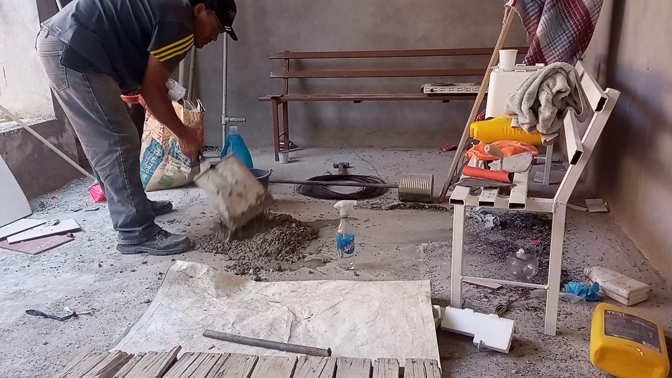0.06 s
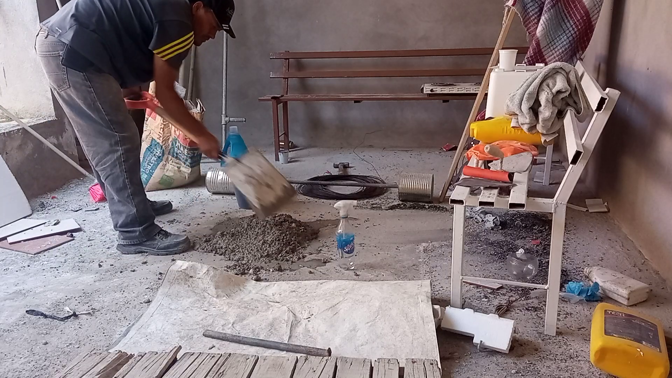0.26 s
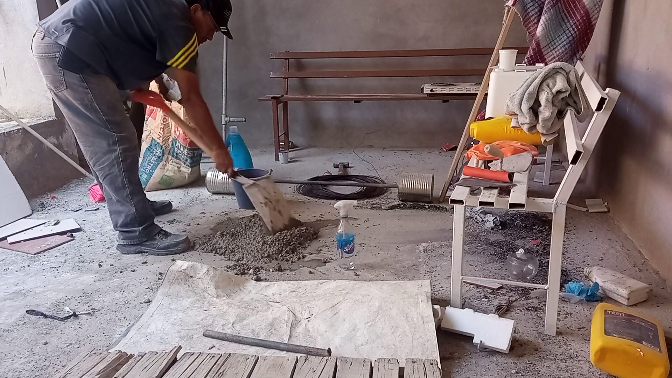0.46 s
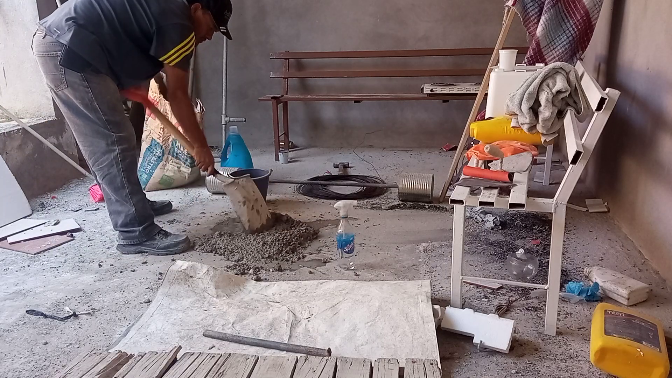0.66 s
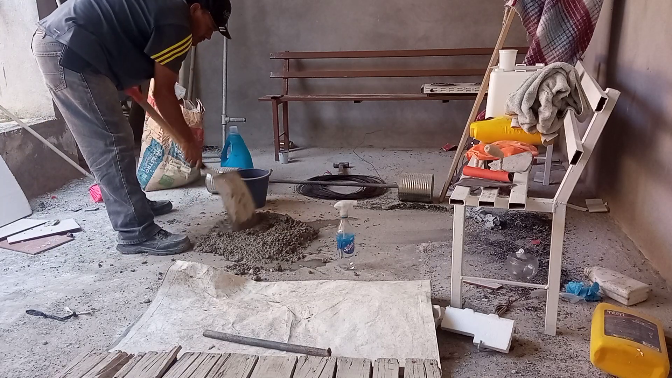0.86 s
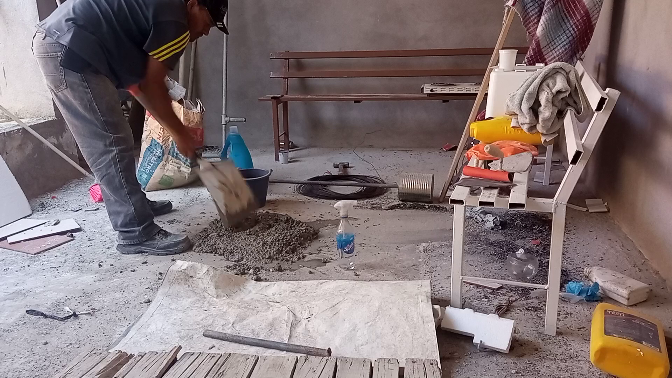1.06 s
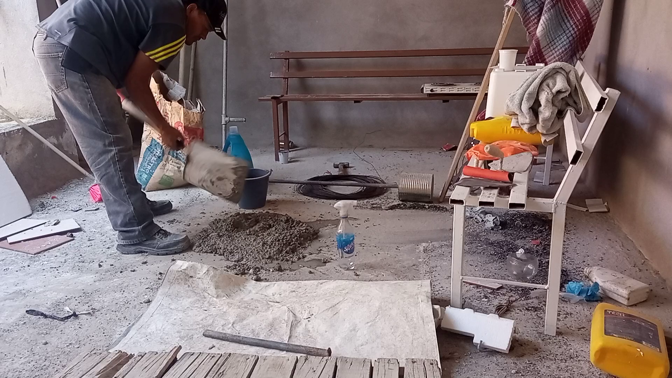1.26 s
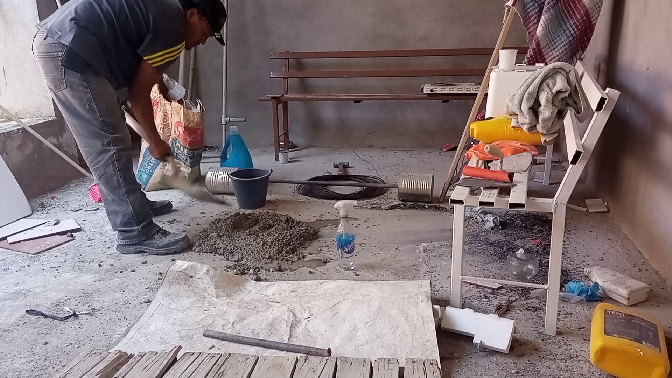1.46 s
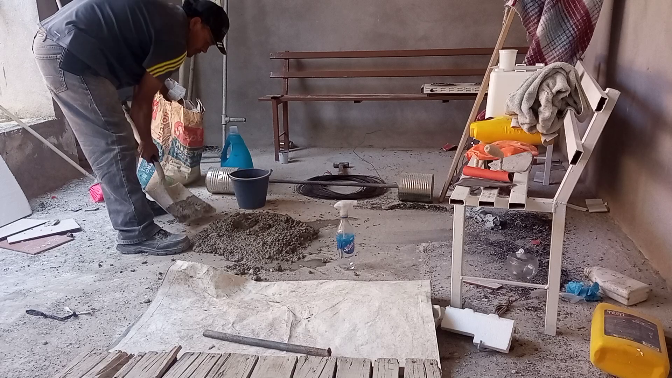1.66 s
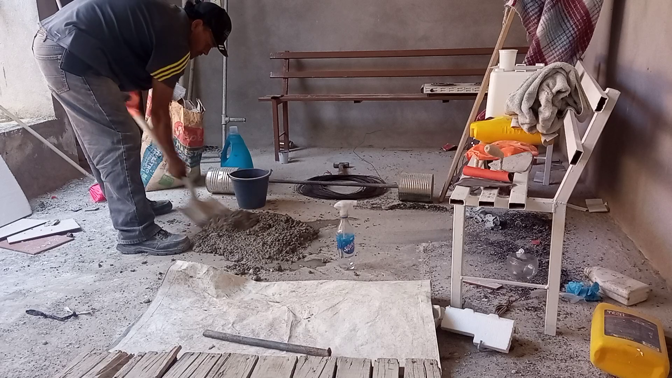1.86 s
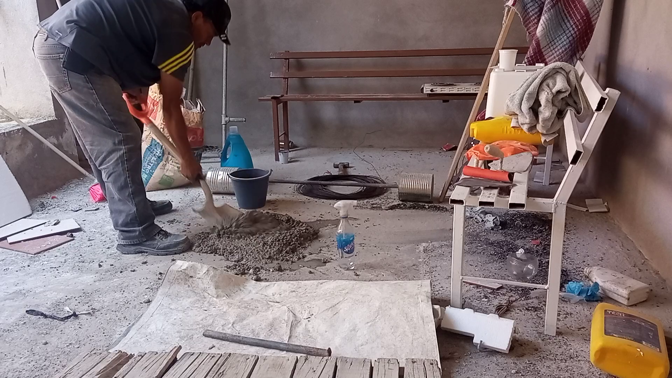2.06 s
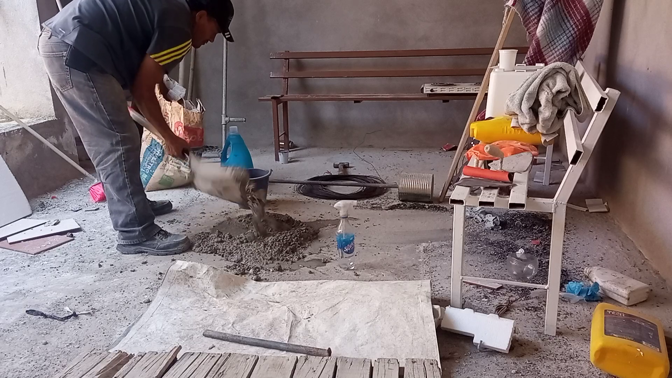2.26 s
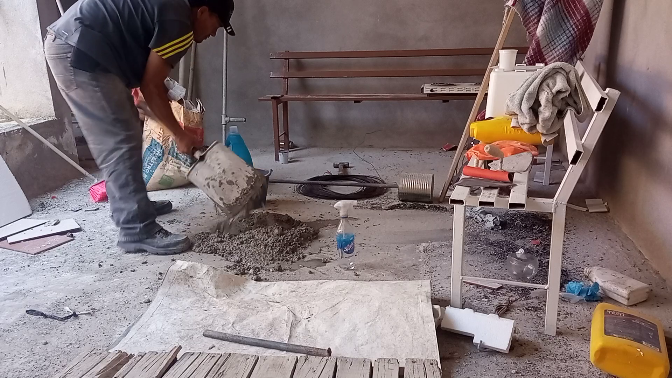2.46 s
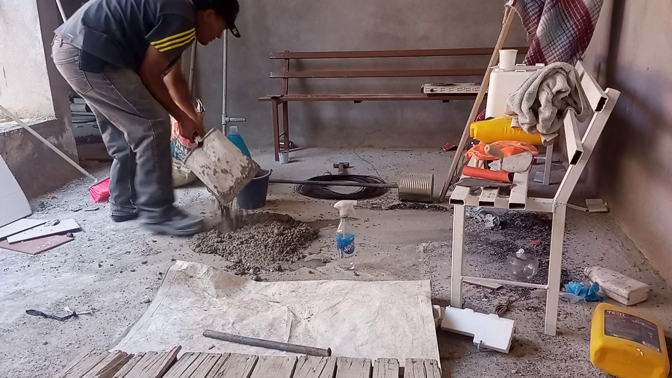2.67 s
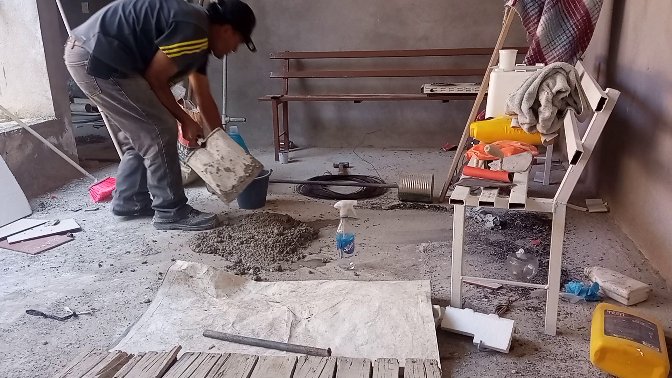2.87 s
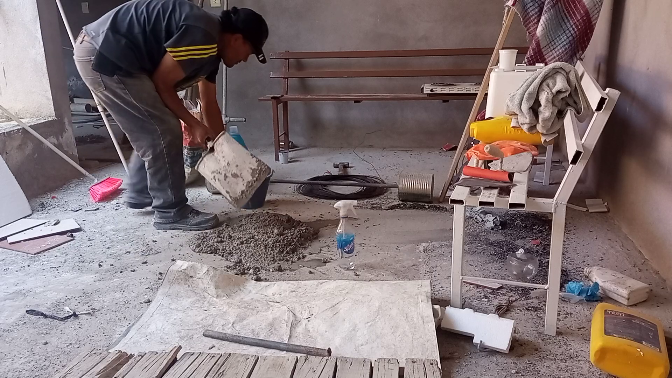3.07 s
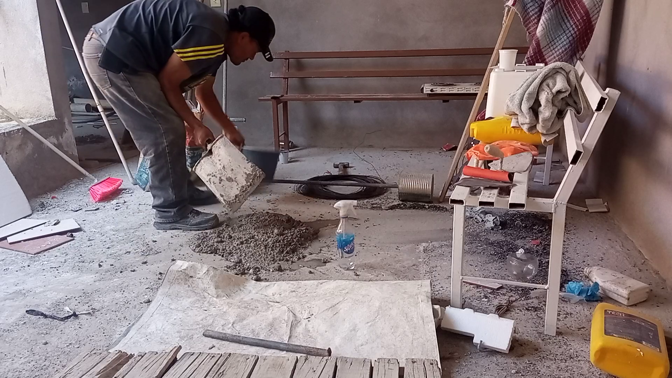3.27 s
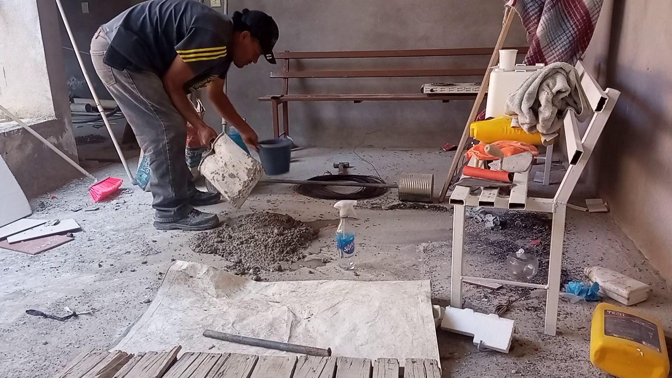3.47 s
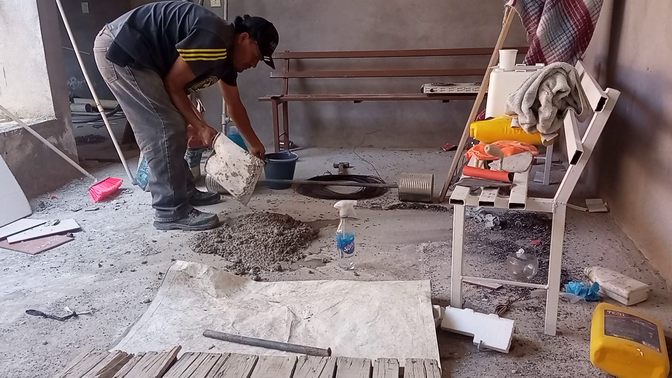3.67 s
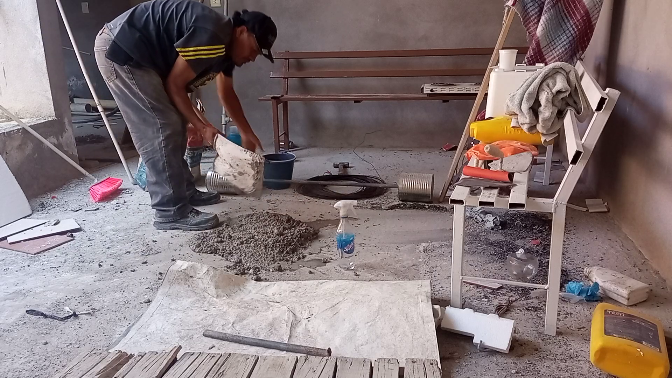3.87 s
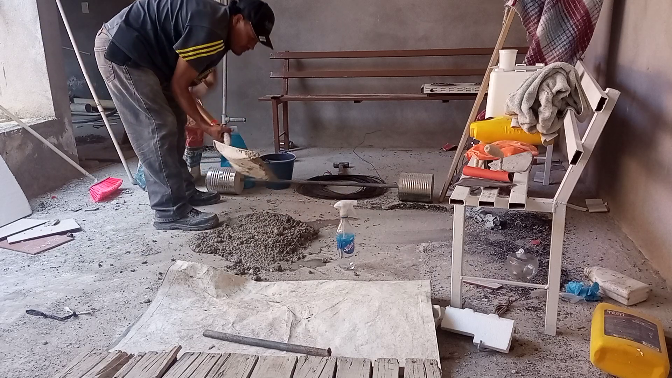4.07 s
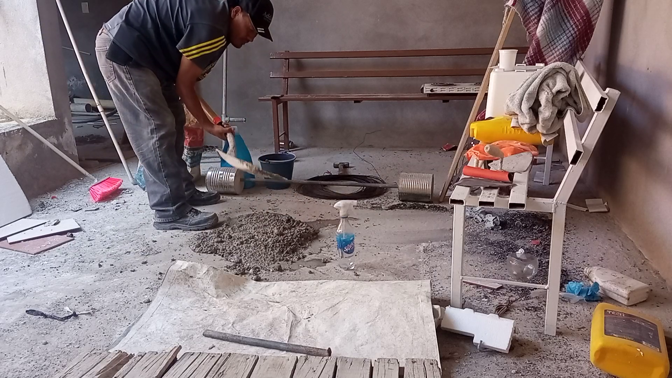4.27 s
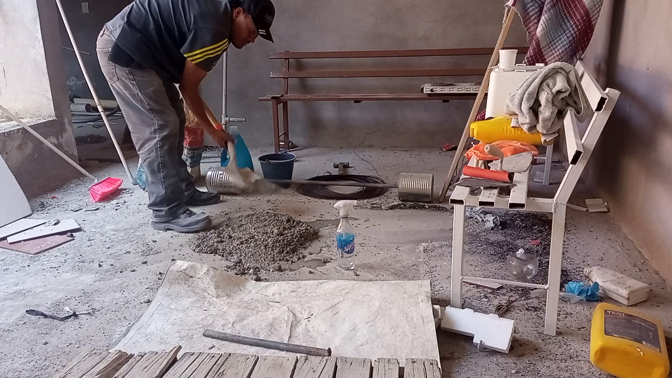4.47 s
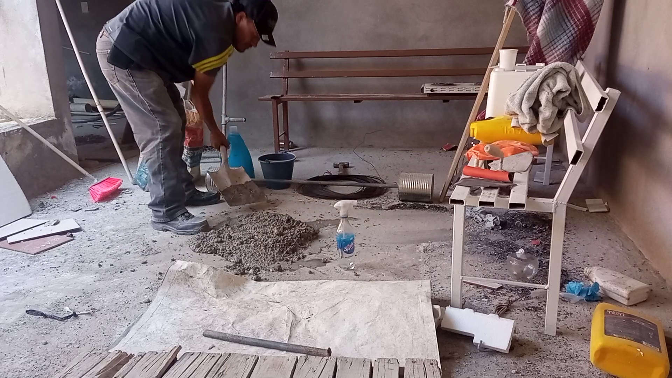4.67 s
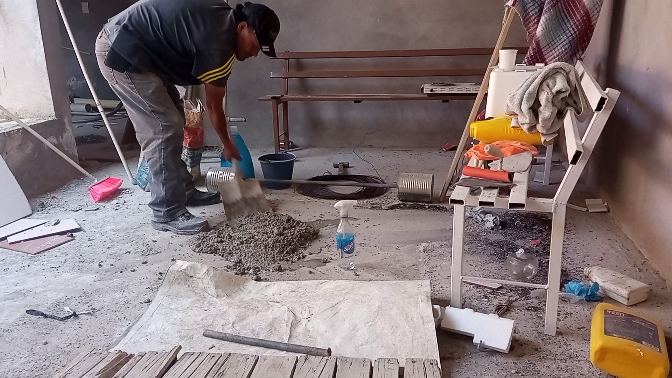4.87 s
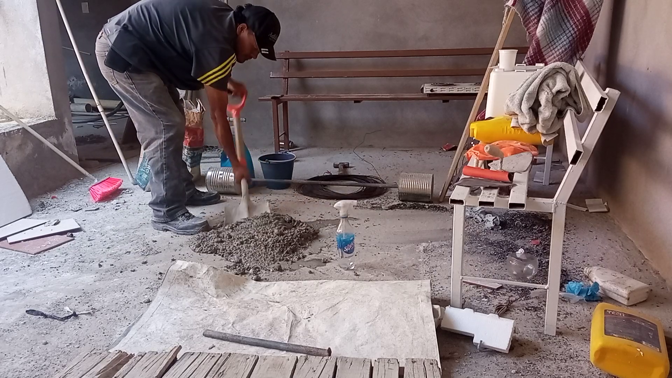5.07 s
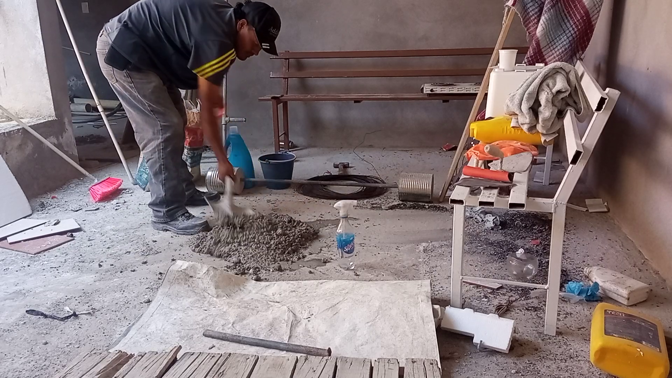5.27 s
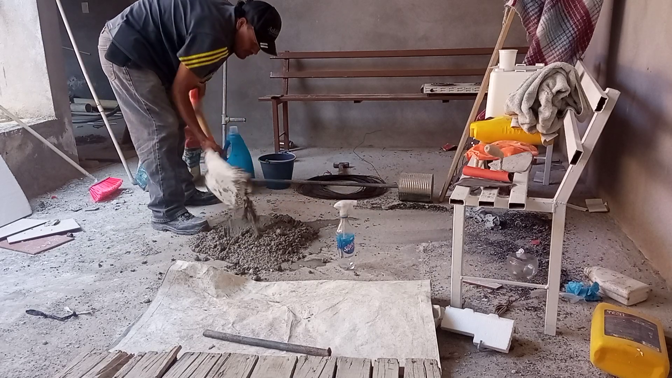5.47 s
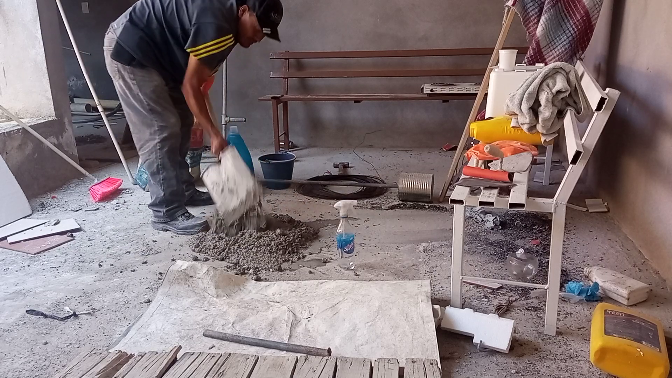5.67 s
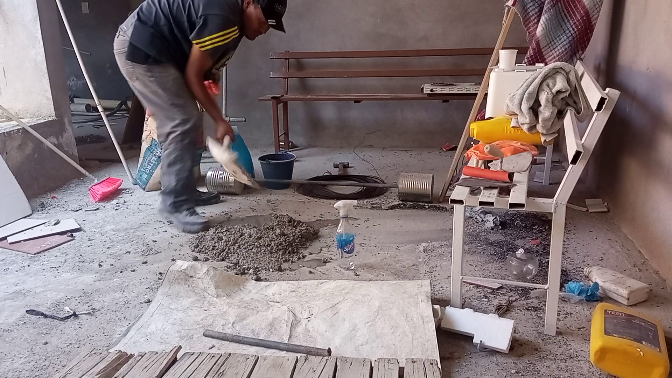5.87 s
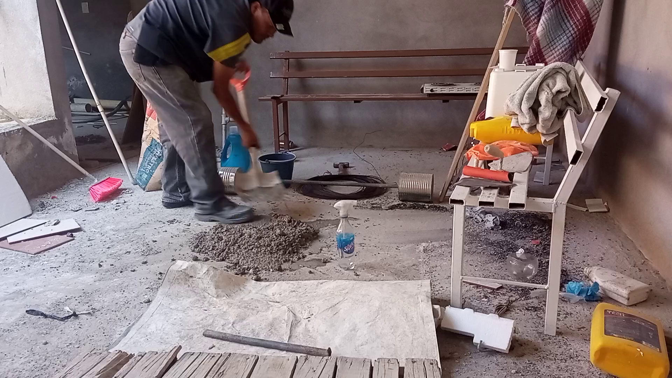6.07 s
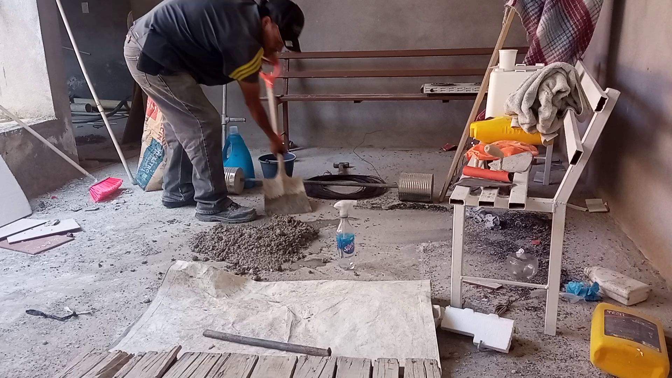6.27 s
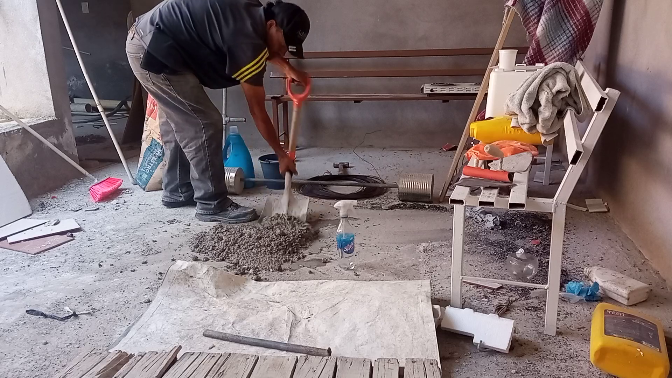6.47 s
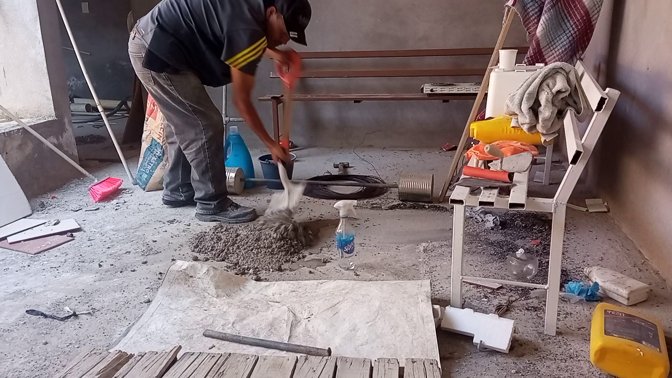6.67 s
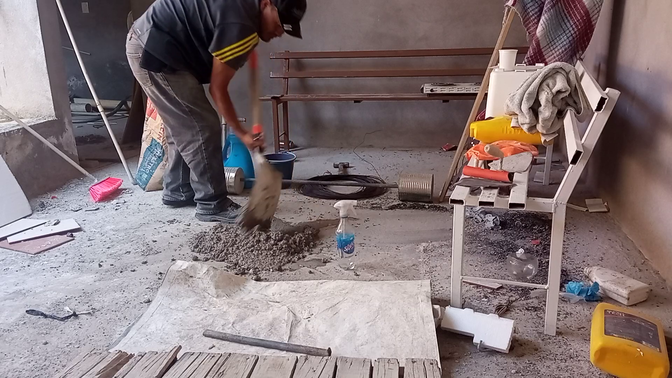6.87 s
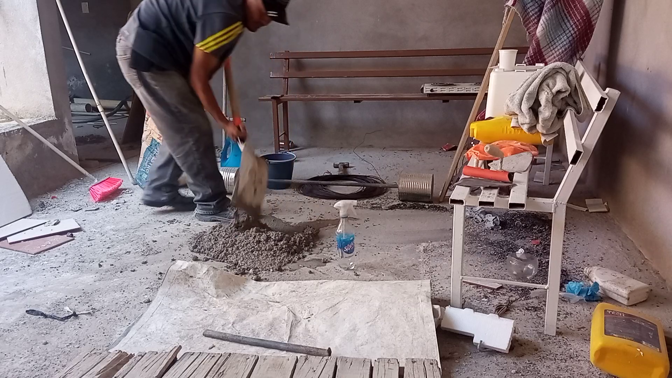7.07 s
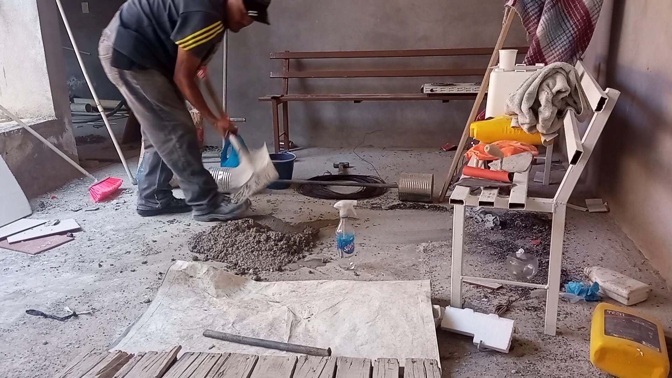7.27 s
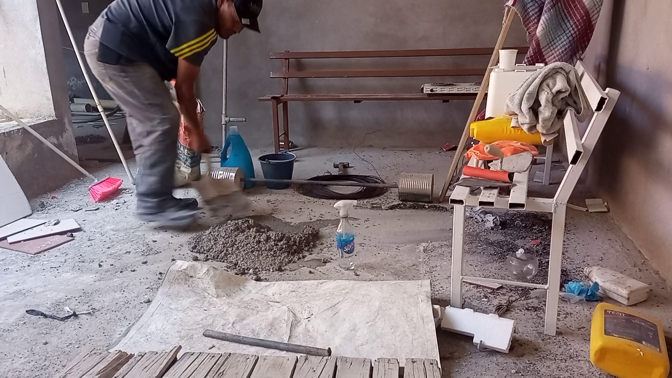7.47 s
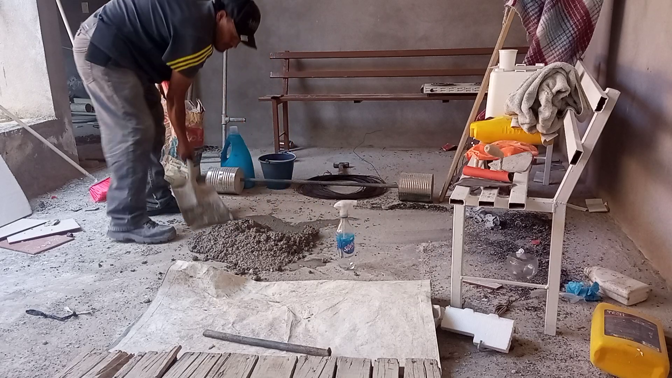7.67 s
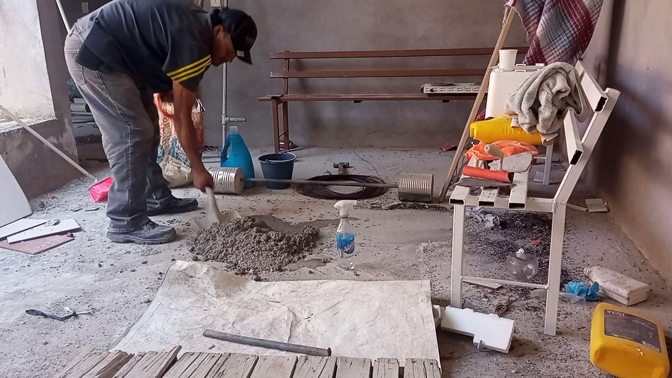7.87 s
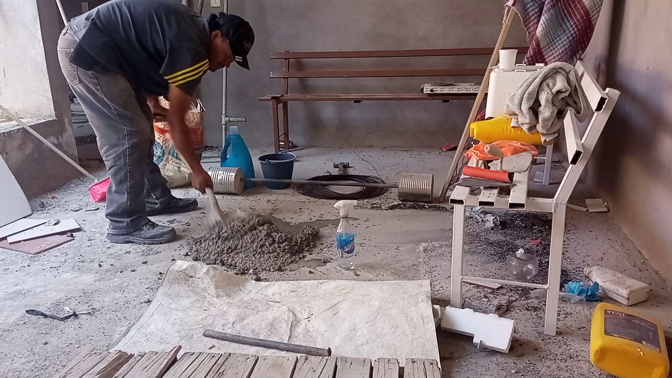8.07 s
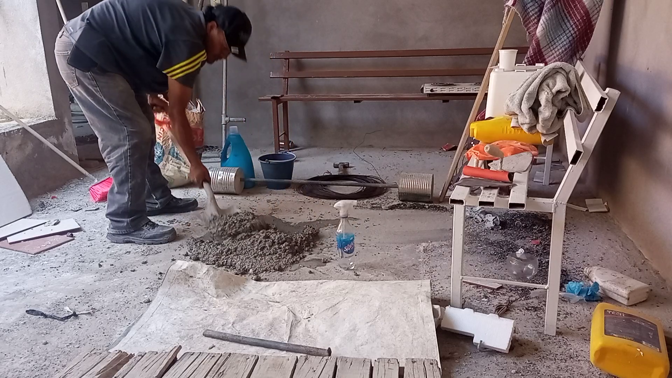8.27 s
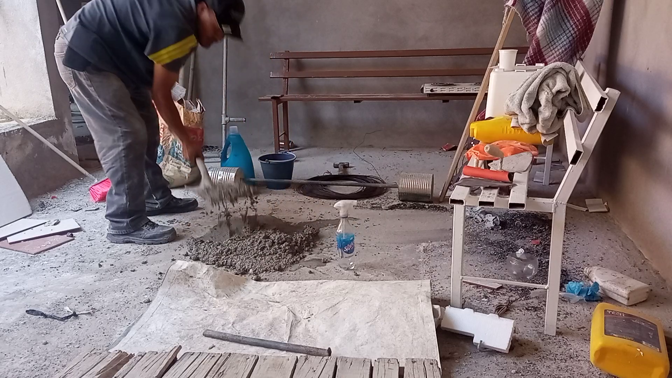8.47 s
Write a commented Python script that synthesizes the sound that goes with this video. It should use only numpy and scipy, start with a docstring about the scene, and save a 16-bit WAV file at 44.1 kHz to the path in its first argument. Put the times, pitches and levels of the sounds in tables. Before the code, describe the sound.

A steel shovel scrapes over gritty concrete and turns wet sand and cement, with one hollow bucket knock in a bare, echoing room.

```python
"""A steel shovel turns wet sand and cement on a concrete floor, in a bare, ringing room.
First the mix slides off the blade and falls in clods; near 1.8 s the blade lands, grinds over
grit and fills. As that load slides off, the worker shifts his feet, and at 3.7 s he sets a
plastic bucket down with a hollow knock. Two light clacks near 4.4 s lead into three more strokes
(4.9, 6.3 and 7.7 s), each trailed by the hiss of sliding mix; a few more clods land around 7 s."""
import sys
import numpy as np
from scipy import signal
from scipy.fft import rfft, irfft
from scipy.io import wavfile

SR = 44100
rng = np.random.default_rng(int(sys.argv[2]) if len(sys.argv) > 2 else 0)


def to_wav(sig):
    """Store sig (one row per channel, or 1-D mono) as 16-bit WAV at the path in sys.argv[1].

    Samples outside -1..1 are clipped; the rate is SR.
    """
    pcm = np.clip(np.atleast_2d(sig), -1, 1) * 32767
    pcm = np.round(pcm).astype(np.int16)
    wavfile.write(sys.argv[1], SR, pcm.T)  # frames by channels


N = 375728
TIME = np.arange(N) / SR
HALF_SECOND = TIME[:SR // 2]


def amp(db):
    """Decibels to gain."""
    return 10 ** (np.asarray(db) / 20)


def unit(x):
    """Scales to rms 1."""
    return x / np.sqrt(np.mean(x ** 2) + 1e-20)


def unit_hit(x):
    """Scales a one-shot to the energy of 20 ms at rms 1."""
    return x * np.sqrt(SR / 50 / (np.sum(x ** 2) + 1e-20))


def curve_at(points, hz):
    """Joins (frequency, value) points by lines on a log-frequency axis."""
    point_hz, value = np.transpose(points)
    return np.interp(np.log(hz + 1), np.log(point_hz), value)


def add(track, start_s, sound):
    """Mixes a sound into the track at its cue."""
    part = track[max(round(start_s * SR), 0):][:len(sound)]
    part += sound[:len(part)]


def eq(x, spectrum, size=4096):
    """Minimum-phase EQ, so that clicks keep their sharp attack."""
    hz = abs(np.fft.fftfreq(size, 1 / SR))
    log_gain = np.log(amp(curve_at(spectrum, hz)))
    taps = np.fft.ifft(np.exp(np.conj(signal.hilbert(log_gain)))).real
    return signal.oaconvolve(x, taps[:size // 2])[:len(x)]


def resonate(x, hz, width_hz):
    """A resonance of gain 1 whose centre follows hz."""
    carrier = np.exp(2j * np.pi * np.cumsum(hz * np.ones(len(x))) / SR)
    pole = np.exp(-np.pi * abs(width_hz) / SR)
    return 2 * (carrier * signal.lfilter([1 - pole], [1, -pole], x / carrier + 1e-18)).real


def ring(modes, contact_s=0.00056):
    """One second of a struck body's dying modes; a longer contact softens the attack."""
    t = TIME[:SR]
    attack = 1 - np.exp(-(t / contact_s) ** 2)
    return attack * sum(amp(db - 60 * t / t60) * np.sin(2 * np.pi * hz * t) for hz, db, t60 in modes)


def crunch(per_s, spread_db, size=N):
    """Random clicks of breaking grains: many small, a few large."""
    strength = amp(spread_db * np.minimum(rng.exponential(1, size), 4))
    polarity = rng.choice([-1, 1], size)
    return unit(strength * polarity * (rng.random(size) < per_s / SR))


def waver(rate_hz):
    """Smooth random modulation of rms 1, rolling off above the given rate."""
    hz = np.fft.rfftfreq(N, 1 / SR)
    return unit(irfft(rfft(rng.standard_normal(N)) * np.exp(-(hz / rate_hz) ** 2), N))


def burst(spectrum, decay_s, per_s, rise_s=0.0046):
    """A short spray of grains that swells and dies."""
    envelope = (1 - np.exp(-HALF_SECOND / rise_s)) * np.exp(-HALF_SECOND / decay_s)
    return unit_hit(eq(crunch(per_s, 2.5, len(envelope)) * envelope, spectrum))


# room tone: (frequency [Hz], level [dB])
AIR_EQ = [(20, -1.5), (45, 6.5), (63, 13.5), (100, 11), (250, -3), (600, -13.5), (1200, -20), (2000, -23),
          (4200, -15.5), (7000, -37.5), (9500, -21.5), (12000, -42), (16000, -53.5)]

def room_tone():
    """The steady air of the room: a low rumble with a trace of hiss."""
    return unit(eq(rng.standard_normal(N), AIR_EQ))


# reverb time of the bare room: (frequency [Hz], t60 [s])
ROOM_DECAY = [(80, 1.8), (220, 0.98), (600, 0.85), (2000, 0.79), (4000, 0.72), (6500, 0.59), (9500, 0.45),
              (12500, 0.36), (16000, 0.35)]

def reverb(x, wet_db, cycle_hz, tail_count=5, build_s=0.0005):
    """Dry sound plus dense wall echoes; the treble dies first, the pattern shifts as if it moved."""
    size = SR * 3 // 2
    hz, t, noise = signal.stft(rng.standard_normal((tail_count, size)), SR, nperseg=256)
    decay = amp(-60 * t / curve_at(ROOM_DECAY, hz)[:, None])
    tails = signal.istft(noise * decay, SR, nperseg=256)[1][:, :size]
    tails *= 1 - np.exp(-TIME[:size] / build_s)
    echoes = np.zeros(N)
    for k, tail in enumerate(tails):
        position = (TIME * cycle_hz * tail_count - k) % tail_count
        send = np.sin(np.pi / 2 * np.minimum(position, 2))  # equal-power crossfade between tails
        echoes += signal.fftconvolve(x * send, tail / np.linalg.norm(tail))[:N]
    return (x + amp(wet_db) * echoes) / np.hypot(1, amp(wet_db))


# soft thump, dry scuff and bright grit: (frequency [Hz], level [dB])
THUMP_EQ = [(25, -26.5), (65, -1), (130, -1.5), (230, 4.5), (330, -7), (600, -10.5), (1500, -51.5),
            (6000, -49)]
SCUFF_EQ = [(100, -18.5), (350, -9.5), (700, 1), (1400, 5), (2200, -1.5), (5000, -5.5), (9000, -12.5),
            (16000, -14)]
GRIT_EQ = [(800, -19), (3000, 1), (6000, 1), (10000, 1), (16000, 6.5)]
# shoes on the gritty floor: (time [s], thump [dB], scuff [dB], scuff decay [s])
FOOTSTEPS = [(1.441, -70, -80.5, 0.022), (1.488, -68.5, -78.5, 0.041), (2.78, -48, -63.5, 0.026),
             (2.81, -45.5, -54, 0.01), (3.019, -69, -67.5, 0.058), (3.23, -64, -82.5, .018),
             (3.299, -65.5, -77.5, 0.032), (3.341, -51, -53.5, 0.022), (3.49, -71.5, -63.5, 0.022),
             (6.12, -56.5, -55.5, 0.055), (6.14, -48.5, -54, 0.015), (6.239, -61, -71, .04),
             (7.361, -69, -81, 0.025), (7.591, -70.5, -78, 0.013)]
# stray grains cracking: (time [s], level [dB])
GRAIN_CRACKS = [(.376, -58), (1.565, -66), (1.58, -69), (3.005, -63.5), (3.487, -80), (4.712, -68.5),
                (7.41, -64), (7.518, -65.5), (7.544, -67.5), (7.594, -66)]

def footwork():
    """Soles thump and scuff; stray grains crack."""
    track = np.zeros(N)
    for start, thump_db, scuff_db, scuff_s in FOOTSTEPS:
        add(track, start, amp(thump_db) * burst(THUMP_EQ, decay_s=0.011, per_s=3600, rise_s=0.008))
        add(track, start, amp(scuff_db) * burst(SCUFF_EQ, decay_s=scuff_s, per_s=3000, rise_s=0.004))
    for start, db in GRAIN_CRACKS:
        add(track, start, amp(db) * burst(GRIT_EQ, decay_s=0.0066, per_s=2800, rise_s=0.001))
    return track


# modes of the plastic bucket: (frequency [Hz], level [dB], t60 [s])
BUCKET_MODES = [(176, -21.5, .9), (239, -23, 0.88), (287, -9.5, 0.26), (363, -8, 0.28), (430.7, -7.5, .62),
                (450, -9, 1.0), (464.6, 7.5, 0.096), (500.6, -6, 0.62), (518, -9, 0.24), (557, -14, .55),
                (610, -13.5, 0.45), (818, -28, .5), (1273, -29.5, 0.58), (1650, -19.5, 0.18),
                (2490, -24, 0.23), (3530, -29, 0.14)]
# dry clack: (frequency [Hz], level [dB])
CLACK_EQ = [(60, -29.5), (200, 4), (700, 11), (1650, 0), (2700, -9), (3400, -9), (4100, -17.5), (6500, -20),
            (16000, -26)]
# the bucket is set down and bounces; near 4.4 s, two light clacks, probably the shovel being
# picked up: (time [s], hollow boom [dB], clack [dB])
HANDLING_HITS = [(3.667, -17, -32.5), (3.679, -32, -33), (3.703, -22.5, -44.5), (3.744, -28.5, -68.5),
                 (3.833, -38.5, -65), (4.399, -53.5, -57.5), (4.445, -55.5, -48)]

def bucket_and_clacks():
    """The bucket lands, its bottom booming like a drum and its rim clacking; two light clacks follow."""
    boom, clack = np.zeros((2, N))
    for start, boom_db, clack_db in HANDLING_HITS:
        add(boom, start, amp(boom_db) * unit_hit(ring(BUCKET_MODES, contact_s=0.0013)))
        add(clack, start, amp(clack_db) * burst(CLACK_EQ, decay_s=0.0088, per_s=9000))
    return boom, clack


def stone_tick():
    """A stone cracks against steel."""
    return burst(GRIT_EQ, decay_s=0.0079, per_s=8300, rise_s=0.0008)


# hiss of damp sand: (frequency [Hz], level [dB])
SAND_EQ = [(60, -7.5), (250, -6), (700, -11), (1200, -1), (3000, -3), (5000, -6), (9000, -8), (12000, -4),
           (16000, -5)]
# mix leaving the blade: (peak time [s], swell [s], fade [s], level [dB])
SAND_SLIDES = [(.125, 0.51, 0.14, -46), (0.408, 0.044, 0.11, -41.5), (.685, 0.16, 0.16, -47),
               (0.942, .11, 0.057, -42), (2.64, 0.65, 0.33, -44.5), (5.74, 0.41, 0.28, -43.5),
               (6.7, 0.11, 0.55, -54), (7.16, .1, 0.19, -52), (8.312, 0.21, 0.29, -54.5)]

def sliding_mix(clump_db=2, blade_hz=760, blade_db=-12, trickle_db=-22.5):
    """Damp grains run off the blade in loose clumps and stir its low note, swelling from a trickle."""
    grains = crunch(per_s=7000, spread_db=1.3) * amp(clump_db * waver(38))
    hiss = unit(eq(grains, SAND_EQ))
    blade_note = amp(blade_db) * unit(resonate(grains, blade_hz, width_hz=510))
    flow = np.zeros(N)
    for peak, swell, fade, db in SAND_SLIDES:
        away = np.maximum((peak - TIME) / swell, (TIME - peak) / fade)  # 0 at the peak, 1 at the ends
        flow += (away < 1) * amp(db + trickle_db * np.minimum(away, 1))
    return flow * (hiss + blade_note)


# wet splat: (frequency [Hz], level [dB])
SPLAT_EQ = [(50, -40), (150, -5.5), (350, 7.5), (1000, 7), (2000, 6), (3400, 1.5), (5000, -10), (9000, -17),
            (16000, -7.5)]
# clods and blade slaps on the heap: (time [s], splat [dB], thud [dB], thud pitch [Hz], tick [dB])
CLOD_HITS = [(.403, -44, -64, 475, -63), (.414, -39.5, -45, 560, -67), (.427, -57.5, -44.5, 503, -53),
             (.687, -46, -42, 372, -39.5), (.697, -41, -39, 402, -64), (.725, -61, -43.5, 332, -60),
             (.76, -62.5, -47.5, 334, -73), (.92, -51.5, -51, 434, -68), (0.934, -47, -42, 412, -43.5),
             (1.168, -77, -69, 396, -90), (6.939, -41, -46.5, 274, -35.5), (6.951, -47, -47.5, 266, -40),
             (7.16, -49.5, -59, 217, -70)]

def clods(weight_db=-10, thud_s=0.0011, crumbs_db=-14, lead_s=0.015):
    """Loose crumbs arrive first; then the lump lands with a wet splat and a dull thud in the heap."""
    track, t = np.zeros(N), HALF_SECOND
    for start, splat_db, thud_db, hz, tick_db in CLOD_HITS:
        punch = unit_hit(np.sin(2 * np.pi * hz * t) * t * np.exp(-t / thud_s))
        thud = punch + amp(weight_db) * burst(THUMP_EQ, decay_s=0.014, per_s=3000)
        crumbs = burst(SAND_EQ, decay_s=0.01, per_s=5000, rise_s=0.02)
        splat = burst(SPLAT_EQ, decay_s=0.009, per_s=6000, rise_s=0.0006)
        add(track, start - lead_s, amp(splat_db + crumbs_db) * crumbs)
        add(track, start, amp(splat_db) * splat + amp(thud_db) * thud + amp(tick_db) * stone_tick())
    return track


# modes of the steel blade, damped by the mix: (frequency [Hz], level [dB], t60 [s])
BLADE_MODES = [(628.5, 3, 0.055), (802, 3.5, 0.05), (1057, 1.5, 0.064), (1218, 3, 0.036),
               (1442, -14.5, 0.097), (1511, 3.5, 0.026), (1856, -4.5, 0.074), (2063, -2.5, 0.04),
               (2225, -1, 0.036), (2660, 0, 0.023), (3340, -15.5, 0.02), (4150, -18.5, 0.047),
               (6220, -13, 0.025), (6490, -12.5, .04), (8800, -32, .1), (8770, -30, 0.135)]
# steel grinding on concrete: (frequency [Hz], level [dB])
GRIND_EQ = [(150, -20), (500, 0.5), (1200, -3.5), (2100, -4), (3200, -6), (5000, -12.5), (9000, -16),
            (16000, -32)]
# the edge lands or catches on a pebble: (time [s], crack [dB], tick [dB])
EDGE_HITS = [(1.794, -53, -46.5), (1.808, -43, -52), (1.86, -38, -52.5), (4.851, -41, -45),
             (4.861, -46, -43.5), (4.926, -52, -32), (5.017, -31, -31.5), (5.06, -35.5, -56),
             (5.115, -42, -38), (6.324, -38, -42), (6.332, -39, -43), (6.424, -33, -49), (6.513, -36, -56),
             (7.745, -45, -50), (7.756, -40.5, -56), (7.824, -28.5, -42), (7.972, -47, -33.5)]

def edge_catches(ring_db=-3):
    """The edge meets something hard: a gritty crack, a bright tick and a damped ring of steel."""
    track = np.zeros(N)
    for start, crack_db, tick_db in EDGE_HITS:
        add(track, start, amp(crack_db) * burst(GRIND_EQ, decay_s=0.023, per_s=9000))
        add(track, start, amp(tick_db) * stone_tick())
        add(track, start, amp(crack_db + ring_db) * unit_hit(ring(BLADE_MODES)))
    return track


# shovel strokes: (time [s], swell [s], hold [s], fade [s], grind [dB], landing re grind [dB],
# grit re grind [dB], bite [dB], blade drumming [dB], heap drag [dB], half-full blade note [Hz])
SHOVEL_STROKES = [(1.793, 0.096, .05, .085, -28, -6.5, -4, -34.5, -32.5, -34, 718),
                  (4.853, 0.15, 0.063, 0.079, -28, -20, -1, -26, -29, -32.5, 749),
                  (6.323, .13, .065, .05, -26.5, -15, -4.5, -28.5, -32.5, -36.5, 803),
                  (7.75, 0.064, 0.041, 0.12, -27, -6, 0.5, -30, -25, -29, 716)]

def stroke_envelopes(touch_s=0.024, lift_s=0.022, landing_s=0.026, bite_s=0.027):
    """The blade lands, pushes, fills and lifts; returns five layer gains and its note in Hz."""
    light_db, eased_db = -13, -12.5  # start and end of the push
    # from empty to full, the mix smothers the grit, loads the steel and drags on the heap
    fill_grit_db, fill_drum_db, fill_heap_db, fill_octaves = -5.5, 1.5, 12, -0.5
    grind, grit, bite, drum, heap = np.zeros((5, N))
    note_hz = np.full(N, SHOVEL_STROKES[0][-1], float)
    t = HALF_SECOND
    skip = amp(-2.5 * np.exp(-((t - 0.045) / 0.016) ** 2))  # the blade rebounds just after landing
    for start, swell, hold, fade, *levels, hz in SHOVEL_STROKES:
        grind_db, landing_db, grit_db, bite_db, drum_db, heap_db = levels
        length = swell + hold + fade
        contact = np.minimum(t / touch_s, 1) * np.exp(-np.maximum(t - length, 0) / lift_s) * skip
        push = contact * amp(np.interp(t, [0, swell, swell + hold, length], [light_db, 0, 0, eased_db]))
        landing = amp(landing_db) * t / landing_s * np.exp(1 - (t / landing_s) ** 2)
        fill = np.minimum(t / length, 1) - 0.5  # -0.5 empty, 0.5 full
        edge = amp(grind_db) * np.hypot(push, landing * contact)
        dig = np.exp(-((t - swell - hold) / bite_s) ** 2)  # the edge digs in as the hardest push ends
        add(grind, start, edge)
        add(grit, start, edge * amp(grit_db + fill_grit_db * fill))
        add(bite, start, amp(bite_db) * dig)
        add(drum, start, push * amp(drum_db + fill_drum_db * fill))
        add(heap, start, push * amp(heap_db + fill_heap_db * fill))
        note_hz[round(start * SR):][:len(t)] = hz * 2 ** (fill_octaves * fill)
    return grind, grit, bite, drum, heap, note_hz


# low drag of the heap and harsh bite of the edge: (frequency [Hz], level [dB])
HEAP_EQ = [(30, -33), (70, -39.5), (110, -16), (160, -0.5), (235, 3.5), (300, -0.5), (420, 1), (560, -7),
           (1200, -21), (5000, -74.5)]
BITE_EQ = [(300, -31), (900, -11), (1400, 2), (2300, -1), (3500, -13.5), (6000, -24), (16000, -51)]

def scraping(surge_db=2.2, judder_db=2.5, ring_db=-4, rasp_db=-2, chatter_db=-6):
    """The edge sticks and slips over grit and shakes the blade, whose note sinks as it fills."""
    grind_gain, grit_gain, bite_gain, drum_gain, heap_gain, blade_hz = stroke_envelopes()
    slow_db = surge_db * np.clip(waver(45), -2, 1.5)
    quick_db = judder_db * np.clip(waver(160), -2, 1.5)
    judder = unit(amp(slow_db + quick_db))  # one stick-slip motion drives every layer
    slips = crunch(per_s=3500, spread_db=4.6) * judder
    flexing = resonate(resonate(slips, blade_hz, width_hz=820), blade_hz, width_hz=990)
    # the slips fall into step with the blade
    chatter = resonate(flexing, blade_hz * amp(0.5 * waver(25)), width_hz=130)
    drumming = unit(unit(flexing) + amp(chatter_db) * unit(chatter))
    impacts = crunch(per_s=2500, spread_db=4.1) * judder
    steel = unit(signal.oaconvolve(impacts, ring(BLADE_MODES))[:N])
    rasp = unit(eq(crunch(per_s=4000, spread_db=3.6) * judder, GRIND_EQ))
    grinding = amp(rasp_db) * rasp + amp(ring_db) * steel
    grit = unit(eq(crunch(per_s=2000, spread_db=1.7) * judder, GRIT_EQ))
    heap = unit(eq(crunch(per_s=900, spread_db=2.7) * judder, HEAP_EQ))
    bite = unit(eq(crunch(per_s=1800, spread_db=3.5) * judder, BITE_EQ))
    return (grind_gain * grinding + grit_gain * grit + bite_gain * bite
            + drum_gain * drumming + heap_gain * heap)


def scene(air_db=-69, boom_db=2, knocks_db=4):
    """Mono mix: shovelling, knocks and hollow boom, each with its own reverb send, over room tone."""
    boom, clack = bucket_and_clacks()
    air = amp(air_db) * room_tone()
    shovelling = reverb(scraping() + sliding_mix(), wet_db=-1.5, cycle_hz=7)
    hits = edge_catches() + clods() + footwork() + clack
    knocks = amp(knocks_db) * reverb(hits, wet_db=0.5, cycle_hz=20)
    hollow = amp(boom_db) * reverb(boom, wet_db=-5, cycle_hz=14, tail_count=4)
    return (air + hollow + knocks + shovelling)[None]


# response of a small microphone: (frequency [Hz], gain [dB])
MIC_EQ = [(20, -35), (45, -20.5), (62, -11.5), (100, -5.5), (160, -5.5), (4800, 0), (6500, 2.5), (7900, -4),
          (9500, -2.5), (11500, -14), (13800, -22.5), (15000, -12)]

def record(dry, cutoff_hz=15850):
    """A small microphone's thin bass and uneven treble, then a steep high cut."""
    high_cut = signal.firwin(511, cutoff_hz, window=("kaiser", 9), fs=SR)
    return signal.oaconvolve(eq(dry[0], MIC_EQ), high_cut, "same")[None]


dry = scene()
out = record(dry)
to_wav(out)
```